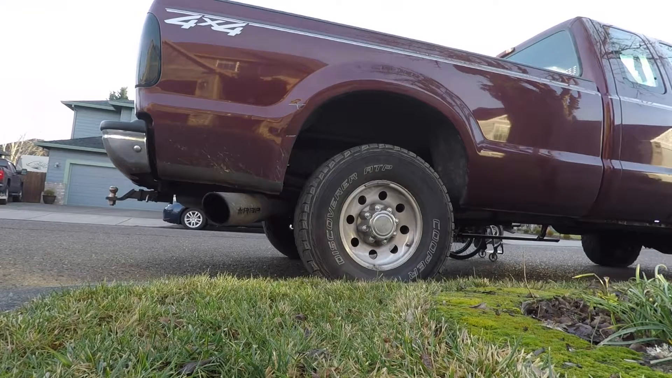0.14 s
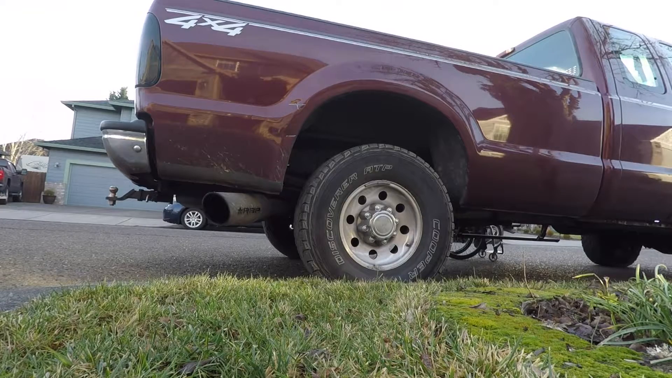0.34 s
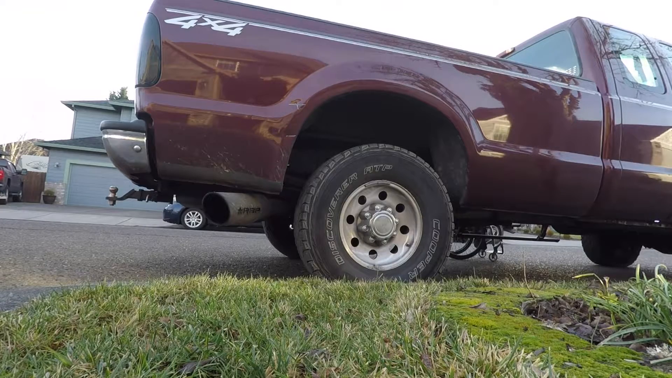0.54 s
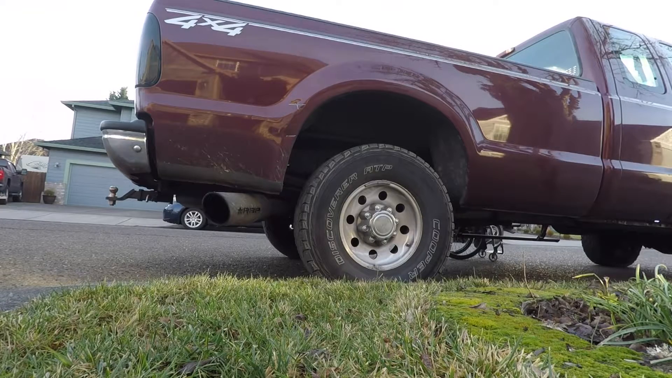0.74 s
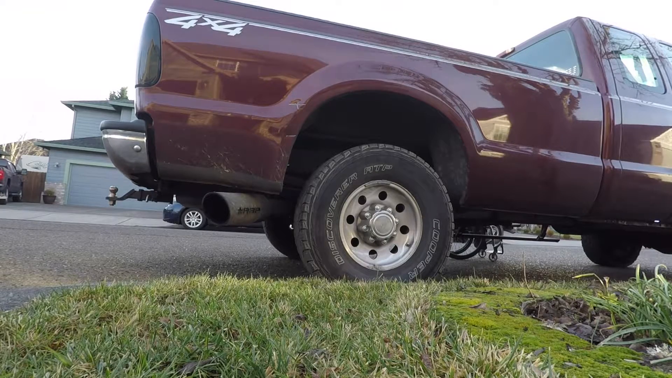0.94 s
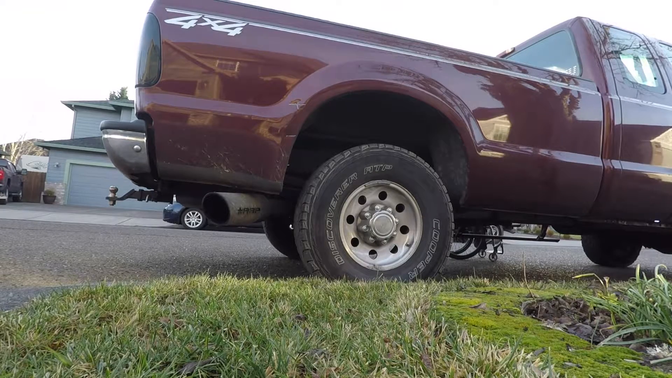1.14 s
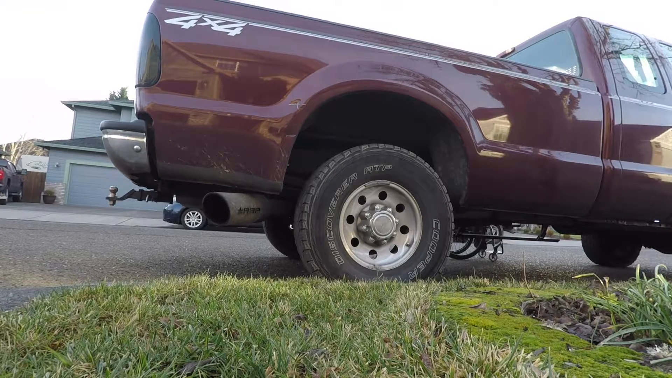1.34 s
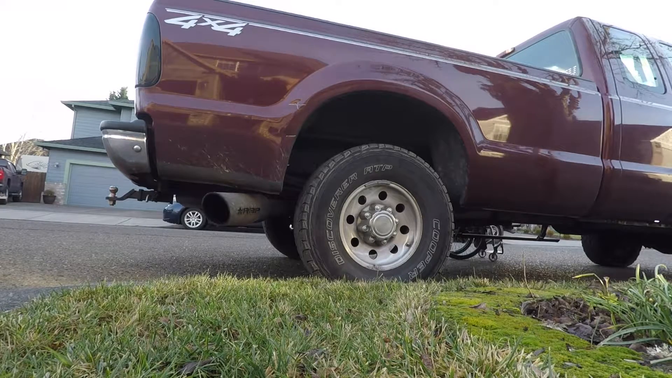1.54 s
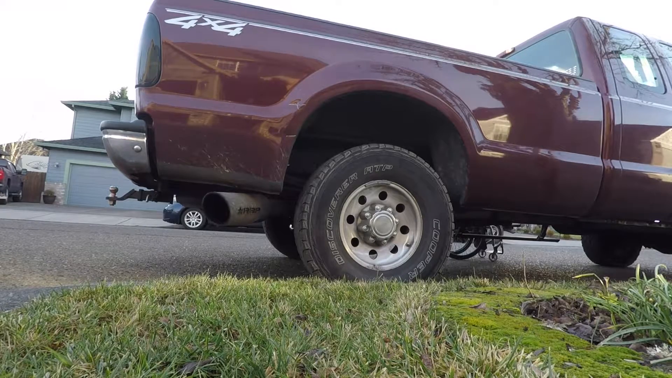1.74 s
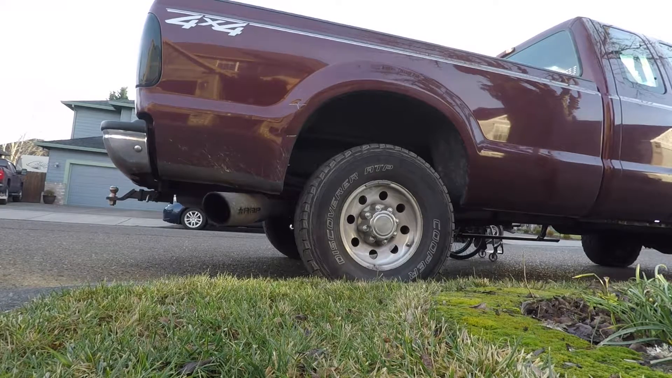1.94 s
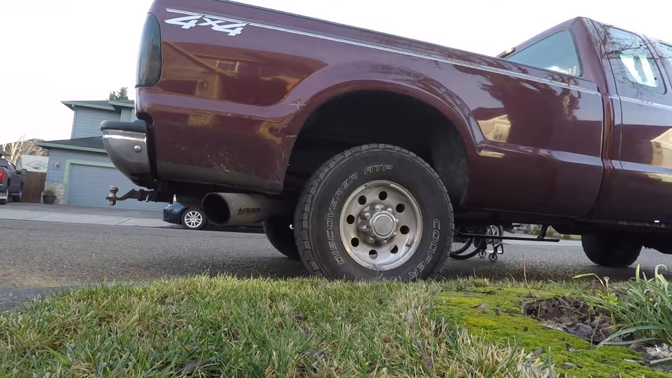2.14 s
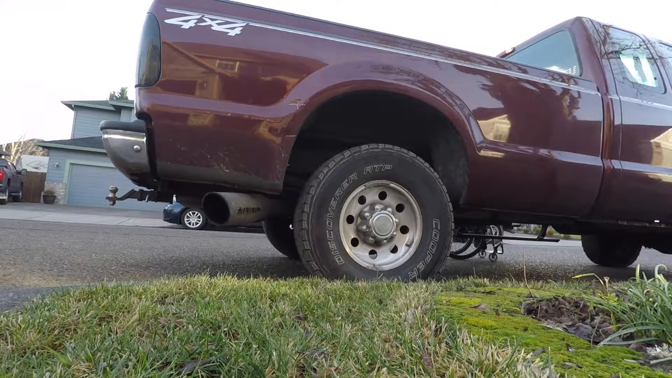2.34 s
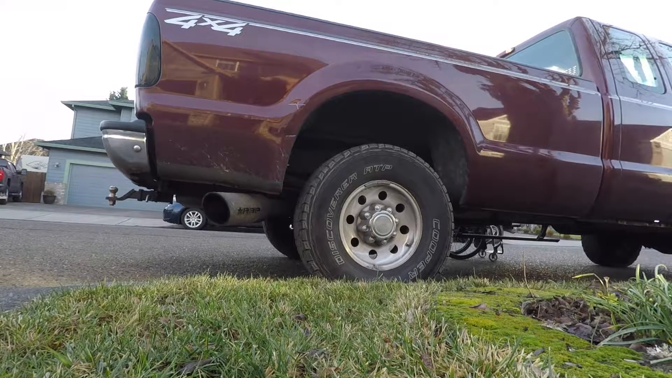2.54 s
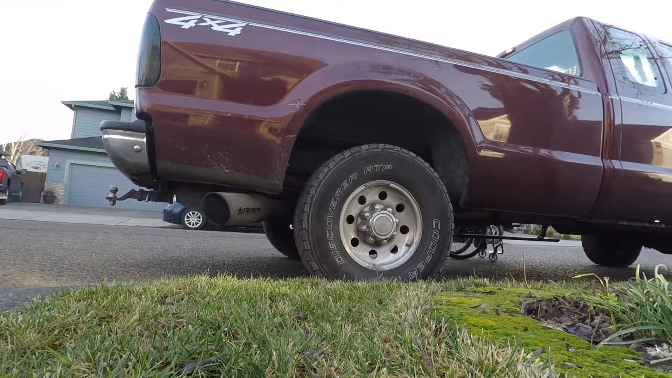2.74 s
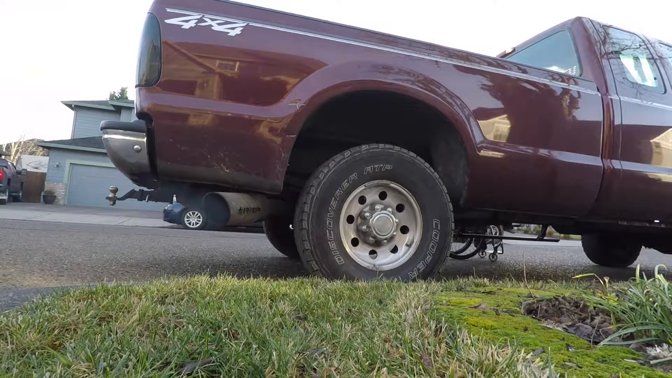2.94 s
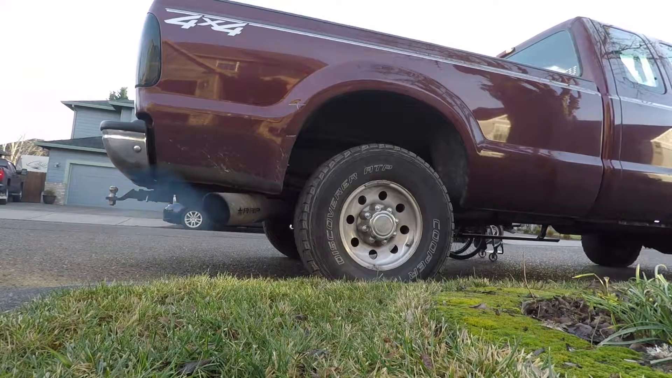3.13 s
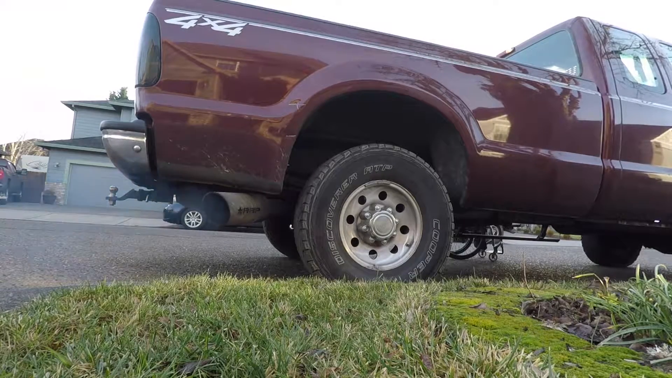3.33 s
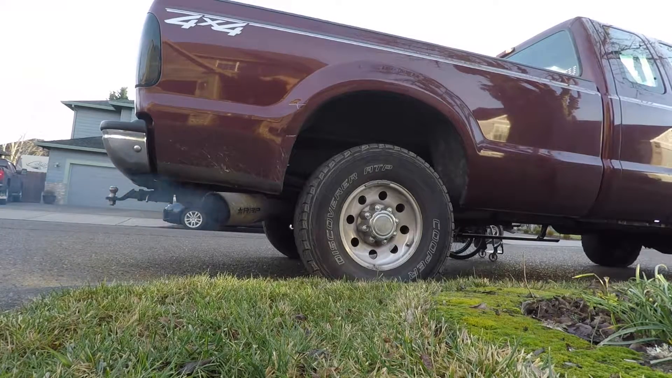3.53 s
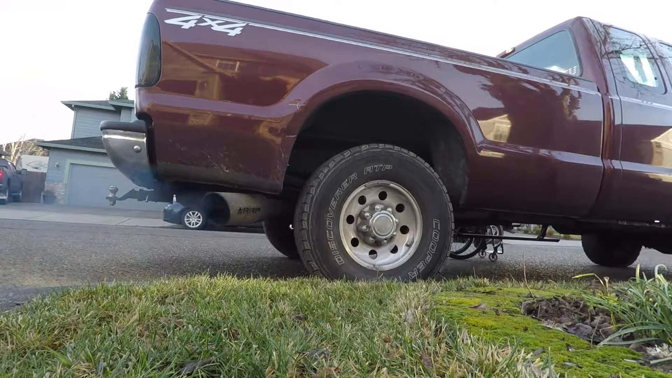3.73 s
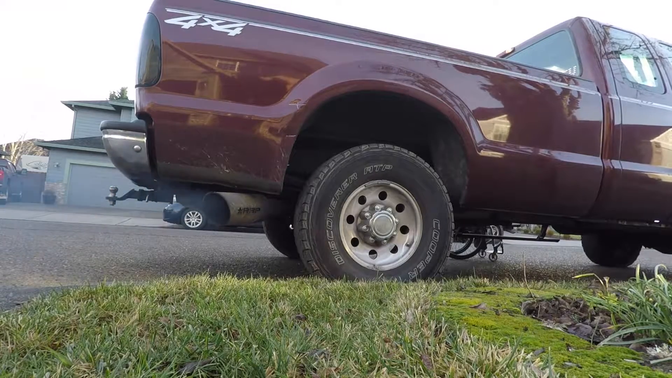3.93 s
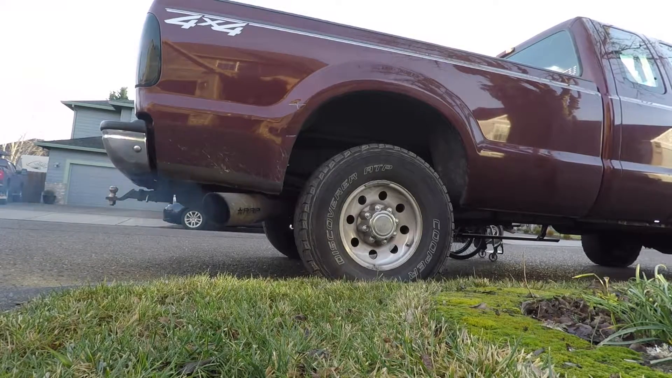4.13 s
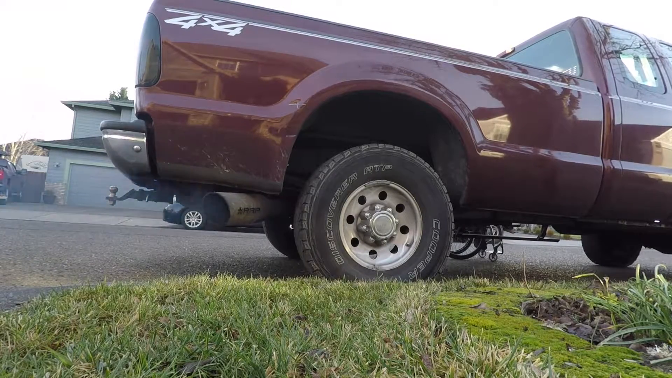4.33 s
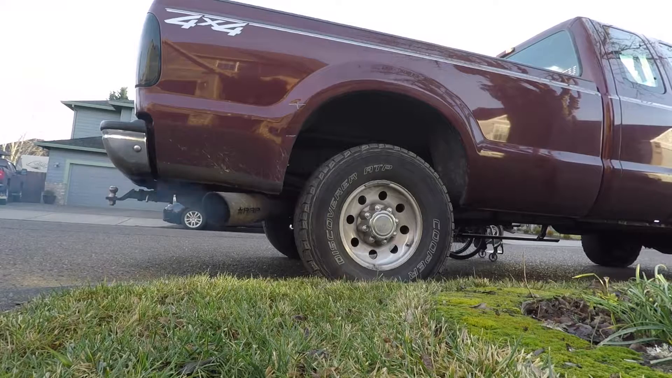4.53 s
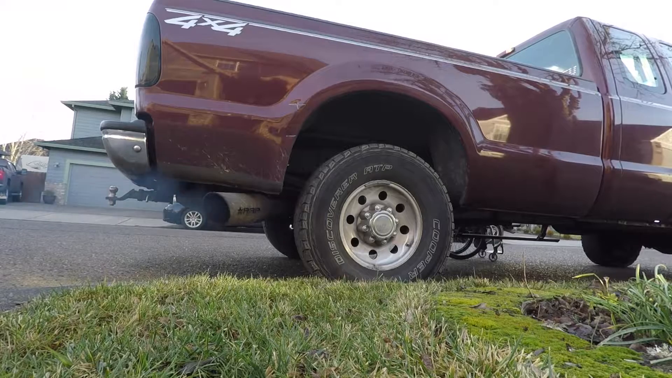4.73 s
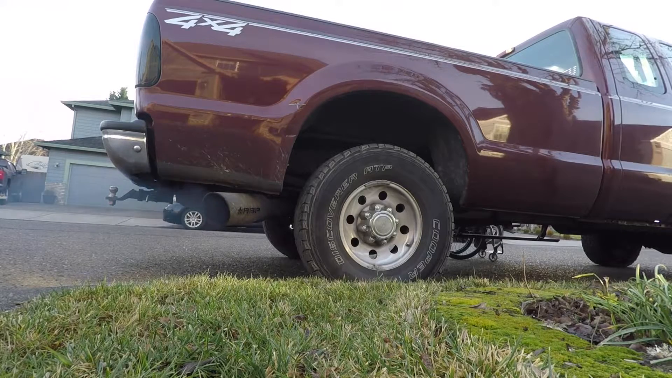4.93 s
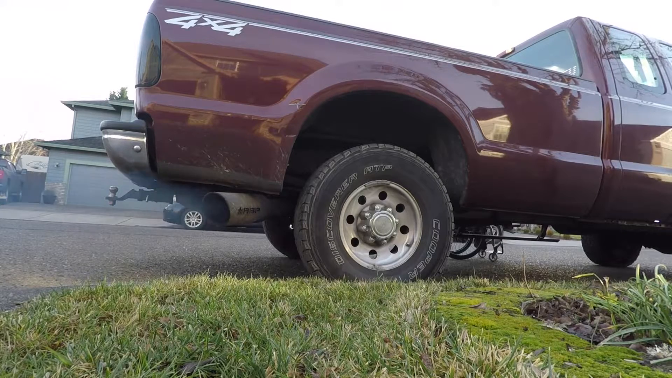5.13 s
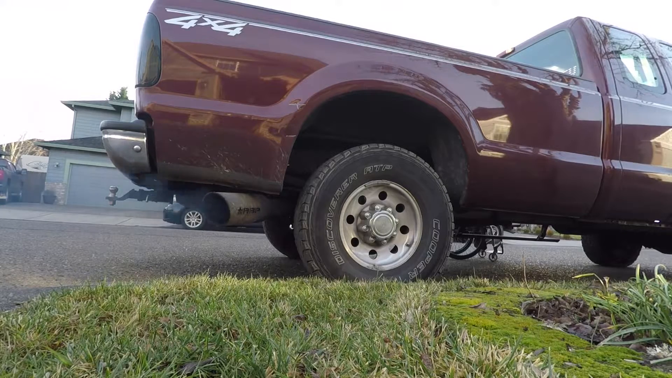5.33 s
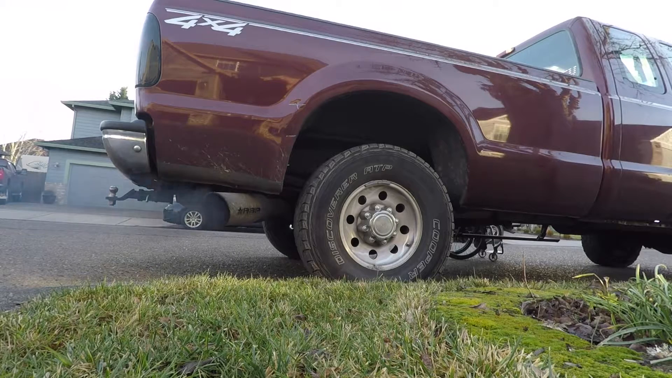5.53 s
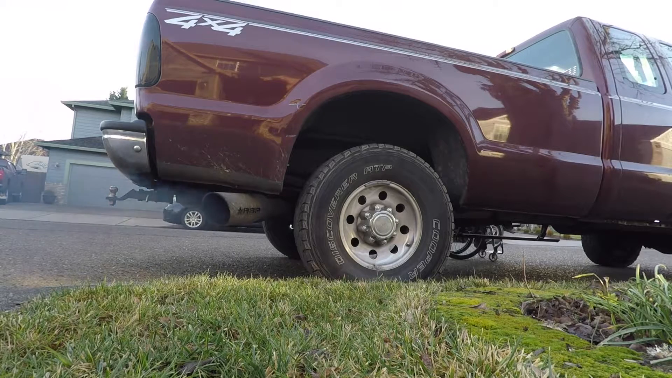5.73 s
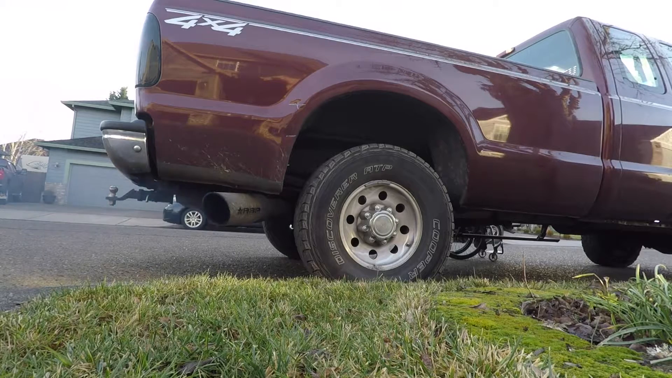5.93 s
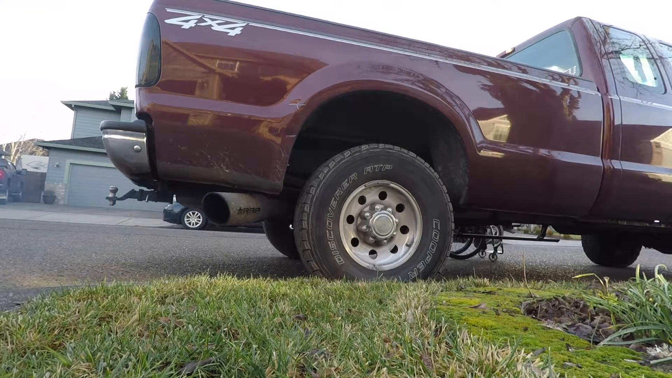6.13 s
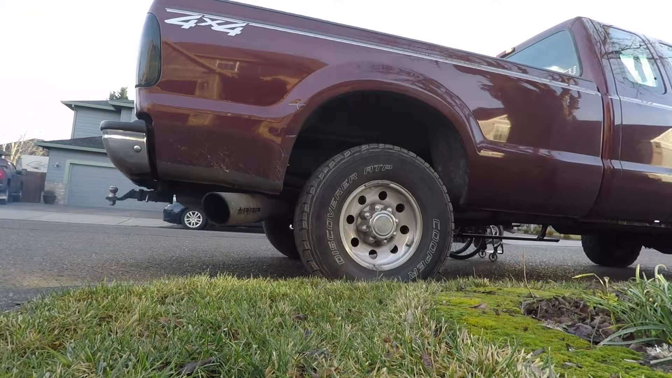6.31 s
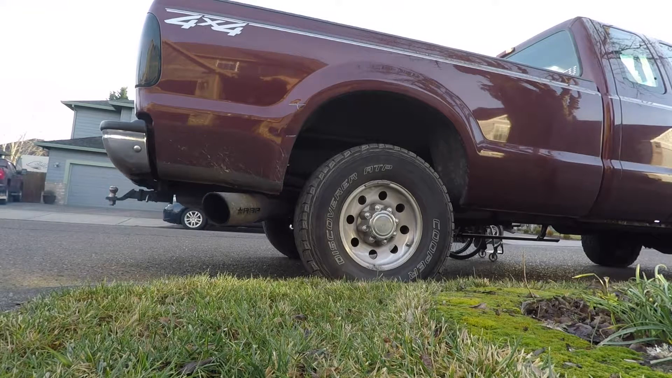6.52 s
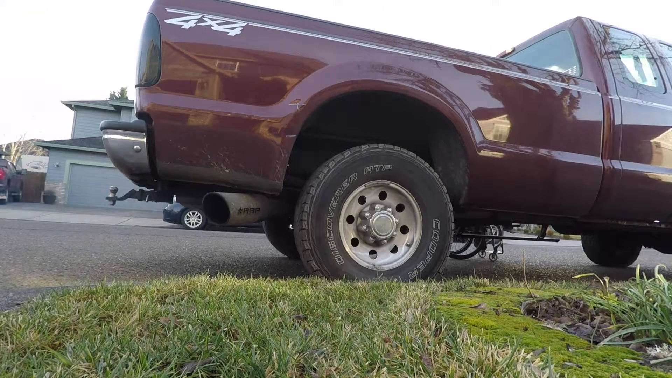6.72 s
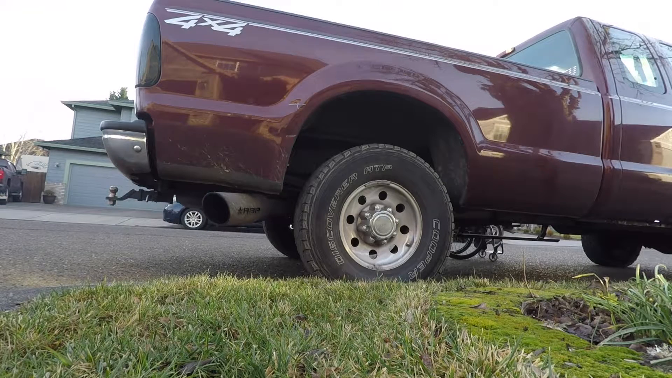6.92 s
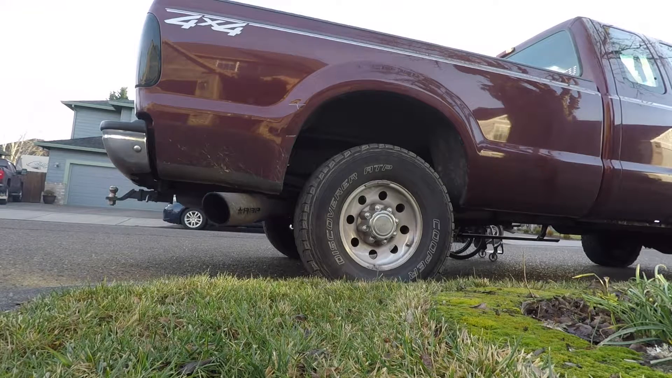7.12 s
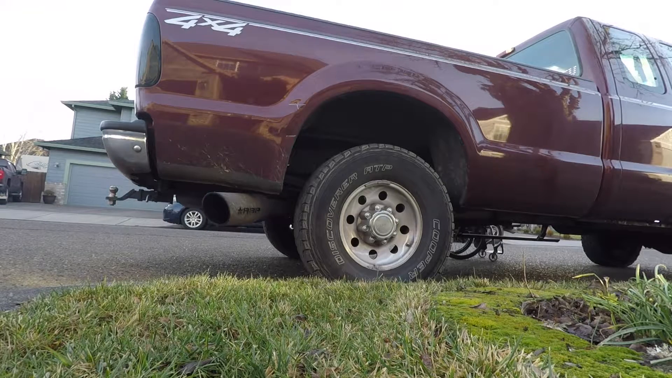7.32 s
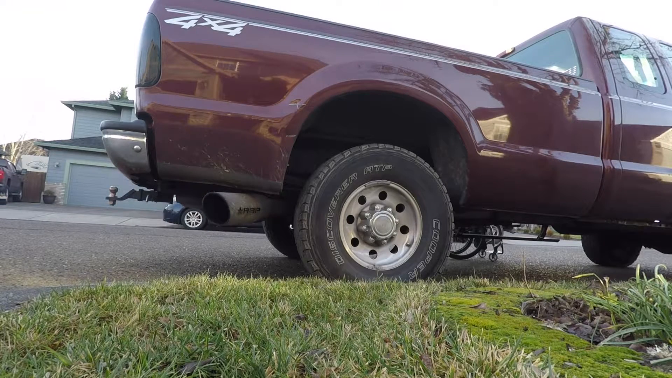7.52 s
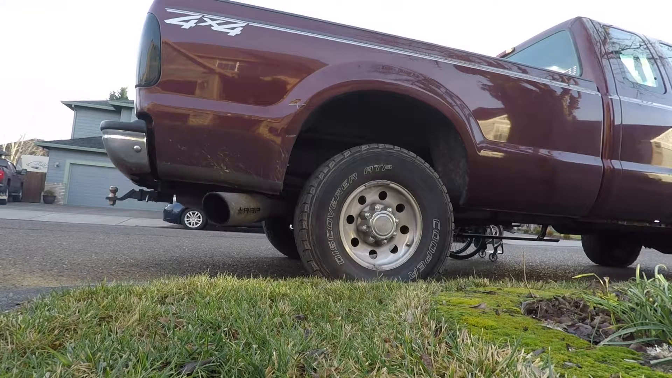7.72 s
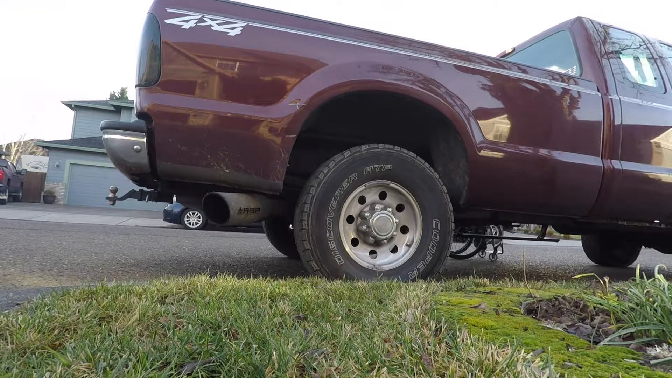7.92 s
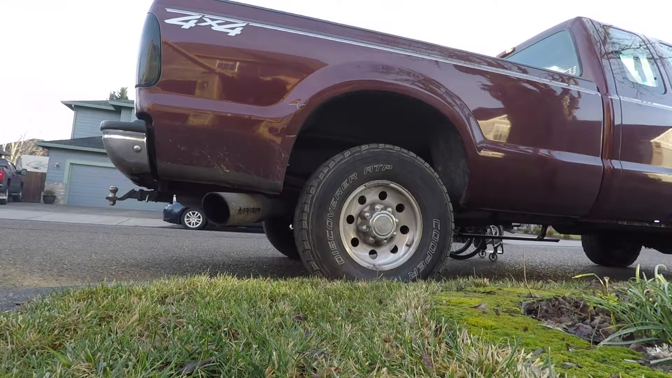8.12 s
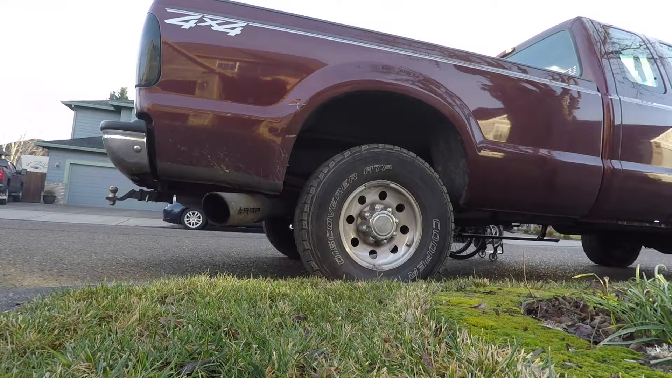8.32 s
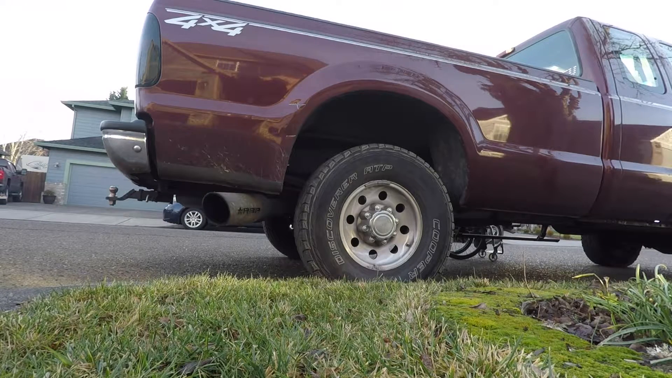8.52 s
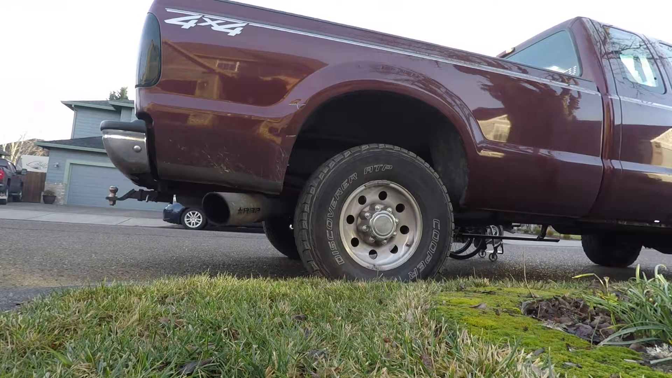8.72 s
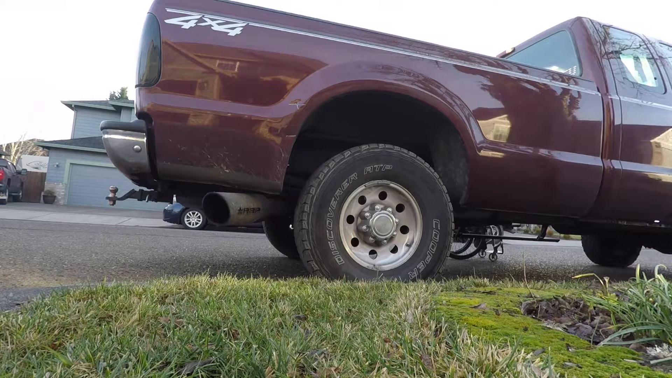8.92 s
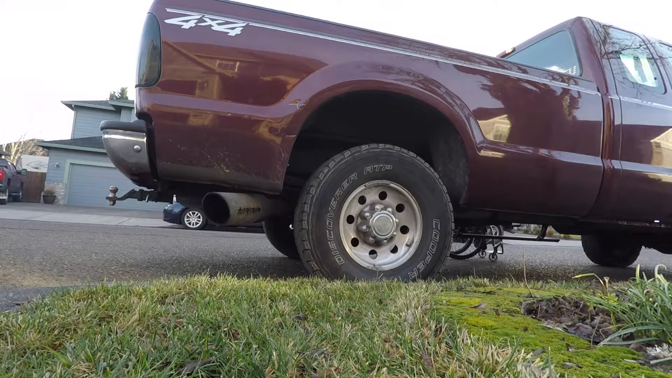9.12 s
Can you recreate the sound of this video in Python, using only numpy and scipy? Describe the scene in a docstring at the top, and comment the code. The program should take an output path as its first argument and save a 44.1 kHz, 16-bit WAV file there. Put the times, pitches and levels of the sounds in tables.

```python
"""A V8 diesel pickup starts from cold, heard from the lawn beside its wide tailpipe.
The engine is a train of strokes timed by the crank: gas slugs ring the pipe, knocks ring the block.
It surges and sags six times, hunts twice more, gently, and settles into a loping, clattering idle
that slowly speeds up. Before it fires, the pump's two sines hum, filtered blows make the starter's
clank, and tooth strikes and noise make its grind. A faint noise band is the distant street."""
import sys
import numpy as np
from scipy import signal
from scipy.io import wavfile
from scipy.ndimage import uniform_filter1d

SR = 44100
rng = np.random.default_rng(int(sys.argv[2]) if len(sys.argv) > 2 else 0)


def unload_audio(sound):
    """Save the sound as a 16-bit wav file, at the path given as the first command line argument."""
    columns = np.transpose(np.atleast_2d(sound))
    # keep every value between -1 and 1, then stretch to whole-number steps
    steps = np.round(np.clip(columns, -1, 1) * 32767)
    wavfile.write(sys.argv[1], SR, steps.astype(np.int16))


N = 408366
TIME = np.arange(N) / SR

# Levels within a spectrum or a set of modes are relative, unless a layer's own level is stated.
# distant street: pitch_hz, level_db
STREET = [(30, -14), (90, -16), (200, 1.5), (600, -3.5), (2000, -14), (6000, -25), (15000, -36)]
STREET_DB = -47
# hum of the fuel pump, before its swell and fade: pitch_hz, level_db
PUMP = [(156.1, -38), (312.2, -58)]

# the solenoid snaps, then the pinion slams into the ring gear: start_s, level_db, decay_s
CLANKS = [(0.064, -19, 0.09), (0.092, -6.5, 0.042), (0.111, 0, 0.039), (.128, -9, 0.021)]
# ring of the bell housing: pitch_hz, width_hz, level_db
BELL = [(297, 61, 3), (424, 68, 5.5), (505, 53, -7), (780, 83, -7), (1240, 110, -22), (2050, 510, -13.5),
        (2540, 190, -15), (3900, 580, -18.5), (5730, 1000, -25.5)]
# the clank is dull at the top: pitch_hz, gain_db
CLANK_TREBLE = [(100, 0), (5000, -0.5), (8000, -0.5), (10500, -8), (13000, -6), (15000, -14)]
# the starter's mesh, which keeps a faint remainder after the last row: time_s, gain (0-1)
STARTER_ON = [(.09, 0), (.13, 1), (1.2, 1), (1.42, 0.88), (1.7, 0.5), (1.74, 0.1)]
# rattle of the starter's gears: pitch_hz, level_db
GEARS = [(600, -22), (1000, 1.5), (1500, 2.5), (2050, 4), (3000, -1), (4600, -3.5), (6400, -7),
         (7400, -15.5), (9000, -16.5), (11400, -33.5), (12800, -18), (14200, -36)]
# growl of the starter's housing: pitch_hz, level_db
HOUSING = [(90, -36), (170, -3), (270, -4.5), (440, -1), (600, -11), (780, -8), (1000, -38), (1800, -38)]
GRIND_ROUGH = .44  # power share of the grinding that is noise rather than tooth strikes
COMPRESSION_PEAK = 0.34  # place in each stroke where the starter strains most
# whine of the starter's own gears, before the mesh gain: time_s, pitch_hz, level_db
WHINE = [(.12, 1400, -57), (.45, 3160, -50), (1.15, 3540, -48), (1.33, 3950, -43), (1.45, 4640, -42),
         (1.7, 5200, -57)]
# partials of the whine: multiple, level_db
WHINE_PARTIALS = [(.5, -7), (1, 0), (1.3, -9)]
# air pumped out of the tailpipe before the engine fires: pitch_hz, level_db
CHUFF = [(12, -16), (24, -3), (34, -1), (55, -3.5), (80, -20), (160, -46)]
# level of that air: time_s, level_db
CHUFF_LEVEL = [(.15, -58), (.6, -34), (1.2, -27.5), (1.5, -21), (1.9, -70)]

# crank speed on the starter: time_s, speed (strokes per second)
CRANK_SPEED = [(0.12, 4.95), (0.42, 5.75), (0.55, 8), (0.75, 8.7), (1.15, 8.58), (1.33, 12.75),
               (1.42, 21.58)]
# crank speed through the hunts into the warming idle: time_s, speed (strokes per second)
IDLE_SPEED = [(4.52, 25.73), (4.66, 44.26), (4.76, 46.1), (4.92, 39.62), (5.06, 38.3), (5.21, 43.47),
              (5.37, 38.01), (5.6, 44.38), (5.8, 42.39), (6, 45.42), (6.35, 45.66), (6.55, 47.2),
              (6.92, 49.74), (7.15, 49.57), (7.4, 51.22), (8.15, 52.2), (8.5, 53.14), (9.26, 54.09)]
# the governor opens the fuel, the engine races, the fuel is cut:
# open_s, cut_s, top_speed (strokes per second), strength_db
SURGES = [(1.48, 1.71, 84, -1.3), (2.07, 2.21, 78, -.3), (2.54, 2.68, 85, .2), (3.05, 3.19, 81, 1),
          (3.56, 3.71, 90, .6), (4.05, 4.19, 86, 2)]
# two milder hunts follow: open_s, cut_s, strength_db
HUNTS = [(4.598, 4.715, -6.5), (5.02, 5.19, -10.5)]
LEAD_S, CUT_S = 0.034, 0.027  # the fuel level rises before the opening and takes a moment to shut off
STALL_SPEED, OPEN_SPEED = 24, 35  # strokes per second near stalling and as the fuel opens
CLIMB_POWER = 1.3  # the climb in speed steepens by this power
PICKUP_S, OVERRUN_S = .05, .015  # the crank picks up before full fuel and runs on past the cut
COAST_S = .12  # time constant of the coast down

# cylinders in firing order: exhaust_db, tailpipe_lag_s, blat_db, knock_db, thud_db
CYLINDERS = [(2, -.0011, 0, 6.5, -12), (1, .0003, 3.5, 3.5, -2.5), (1.5, .0012, -2, -2.5, -15),
             (1.5, .0003, 2, 5, -11.5), (-1, -.0012, 1.5, 6.5, -16.5), (1.5, .0002, 2, 2.5, 3),
             (-1.3, .0013, -2, 4.5, -10.5), (1, .0001, 0.5, 2.5, -7.5)]
# boom under the surges, from dead strokes through first firings and coasting to idle: time_s, level_db
BOOM_LEVEL = [(.15, -53), (.7, -38.5), (1.33, -32), (1.38, -20), (1.45, -17.5), (1.95, -22.5), (2.42, -30),
              (2.88, -22.5), (3.45, -25), (3.98, -25.5), (4.33, -18.5), (4.5, -21.5), (4.7, -16.5),
              (4.87, -14), (4.98, -20), (5.12, -19.5), (5.5, -12), (9.26, -12.5)]
# firings under the surges; the governor holds more fuel as it settles: time_s, blat_db, clatter_db
FIRING_LEVEL = [(1.28, -36, -49), (1.44, -25.5, -37), (2.0, -30, -42.5), (2.45, -34, -46.5),
                (3.95, -33.5, -44.5), (4.5, -27.5, -39.5), (4.97, -25, -37), (5.1, -24.5, -35),
                (5.45, -20, -31.5), (6.3, -20.5, -31.5), (9.26, -19, -30)]
# standing waves of the exhaust system: pitch_hz, width_hz, level_db
PIPE = [(48.8, 16.7, -1), (88.5, 7.3, 3.5), (106.7, 7.5, -6), (119.5, 6.1, -0.5), (153.4, 9, -7.5),
        (188, 8, -9.5), (221.4, 13.3, -7.5)]
# chambers of the muffler, which hold back the tones near their own: pitch_hz, width_hz
MUFFLER = [(122, 58), (172, 55)]
# the pipe under a rush of gas, its standing waves damped: pitch_hz, level_db
RUSH = [(20, -20), (40, -2.5), (55, -3.5), (82, -0.5), (122, 1), (155, -10.5), (188, -3), (215, -7.5),
        (300, -17), (600, -44)]
# the pipe with the flow only churning: pitch_hz, level_db
CHURN = [(20, -13), (45, -1), (62, 0), (85, -6), (120, 1.5), (150, -13), (186, -5), (230, -9.5),
         (300, -21.5), (600, -45)]
# the firing tone rules while the fuel is open and breaks up once it is cut: greatest power share, drop
RUSH_DB, RUSH_DROP_DB = -.15, 4.5
RUSH_FADE_DB_PER_S = 45
# gas leaving the tailpipe at idle: pitch_hz, level_db
BLAT_IDLE = [(90, -29), (150, -19), (176, -20), (218, -9), (262, -10), (300, -3.5), (340, -1), (440, -5.5),
             (540, -7), (660, -4.5), (790, -17), (900, -17.5), (1150, -28), (2000, -42)]
# gas leaving the tailpipe under full fuel: pitch_hz, level_db
BLAT_FULL = [(80, -40), (140, -2.5), (185, 2), (255, -3.5), (340, -1), (450, -2.5), (540, -10), (715, -5),
             (866, -18.5), (1010, -15), (1200, -48), (2000, -49)]
# turbulence behind each slug, which holds little bass: pitch_hz, level_db
EDDIES = [(100, -16), (220, -5), (380, -1), (2000, 0.5)]
GAS_LIKENESS = .7  # power share of the turbulence that recurs with each cylinder
# ring of the muffler when two slugs crowd into one manifold: pitch_hz, width_hz, level_db
THUD = [(219, 32, 1.5), (362, 75, -4)]
# the thud is low and soft, without treble: pitch_hz, gain_db
THUD_BAND = [(120, -20), (190, 0), (420, 0), (700, -18), (1500, -45)]
# level of the thud: time_s, level_db
THUD_LEVEL = [(4.5, -46), (5.5, -38), (6.3, -32), (7, -26), (9.26, -28)]
# hiss of the hard-driven jet: pitch_hz, level_db
RASP = [(700, -19.5), (1200, -7.5), (1700, 3), (2400, -7), (3500, -2.5), (5200, -14), (6300, -12),
        (8200, -21), (10500, -36.5), (13000, -33), (15000, -36)]
# ring of the engine block: pitch_hz, level_db
BLOCK = [(700, -16), (1150, -6.5), (1620, -0.5), (2050, -5), (2650, -14), (3000, -11.5), (4000, -13.5),
         (5300, -24), (6150, -25), (7800, -28), (9200, -39), (11500, -50), (12800, -37), (15000, -53)]
# ringing parts of the engine: pitch_hz, level_db
PARTS = [(1523, 2), (1660, 0.5), (1790, -7), (1954, -3), (2980, -5), (3340, -6.5), (3710, -6.5), (4020, -9)]
# a cold cylinder lights late and knocks hard: start_s, level_db
HARD_KNOCKS = [(5.221, -23.5), (5.424, -25), (5.612, -25), (5.982, -25), (7.080, -23), (7.477, -26),
               (7.771, -28), (7.868, -24.5), (9.077, -28)]
# an overfuelled slug bangs out of the tailpipe: start_s, level_db
BANGS = [(1.502, -5.5), (2.057, -18), (2.105, -13), (2.528, -14), (2.575, -11), (3.122, -9), (3.641, -9),
         (4.041, -18), (4.195, -6)]
# hard-driven firings crack sharply during the surges: start_s, level_db
CRACKS = [(2.093, -30), (2.527, -34.5), (2.575, -31), (2.665, -25), (3.045, -34), (3.075, -27),
          (3.197, -22.5), (3.581, -29), (3.697, -33), (3.989, -40), (4.038, -41), (4.137, -30),
          (4.176, -25), (4.199, -24.5)]
# colour of the cracks: pitch_hz, level_db
CRACK = [(900, -15), (1700, 5), (2400, -7), (3550, 5.5), (4200, 1), (5200, -9), (6300, -7.5), (8200, -16.5),
         (10500, -31), (13000, -29), (15000, -30)]
EDGE_HZ = 15150  # upper band limit


def amp(db):
    """Decibels express an amplitude ratio as 20 times its common logarithm."""
    return 10 ** (np.asarray(db) / 20)


def noise():
    """White noise carries equal power at every frequency."""
    return rng.standard_normal(N)


def along(rows):
    """A two-column path is followed in time by linear interpolation."""
    return np.interp(TIME, *np.transpose(rows))


def evened(x):
    """Division by the root mean square gives unit power."""
    return x / np.sqrt(np.mean(x ** 2) + 1e-20)


def steadied(x, span):
    """Division by the running rms gives roughly unit power over every stretch of span seconds."""
    size = max(int(span * SR), 8)
    power = uniform_filter1d(uniform_filter1d(x ** 2, size), size)
    return x / np.sqrt(abs(power) + 1e-4 * np.mean(x ** 2))


def colour(x, points):
    """Minimum phase: the Hilbert transform of the log gain makes a (Hz, dB) response causal."""
    hz, db = np.transpose(points)
    grid = np.fft.rfftfreq(16384, 1 / SR)
    log_gain = np.log(amp(np.interp(np.log(grid + 1), np.log(hz), db)))
    log_gain -= np.maximum(np.log(grid / hz[-1] + 1e-9), 0) * 3  # cubic fall above the last point
    both_sides = np.r_[log_gain, log_gain[-2:0:-1]]
    ring = np.fft.ifft(np.exp(np.conj(signal.hilbert(both_sides)))).real
    return signal.oaconvolve(x, ring[:len(ring) // 2])[:N]


def resonances(modes):
    """Resonance: the powers of (Hz, width, dB) modes add into one (Hz, dB) response."""
    grid = np.geomspace(12, 15000, 1200)
    power = sum(amp(db) ** 2 / (1 + ((grid ** 2 - hz ** 2) / (grid * width)) ** 2)
                for hz, width, db in modes)
    return np.c_[grid, 10 * np.log10(power)]


def clicks(times, sizes):
    """An impulse at each time excites whatever filter follows."""
    return np.bincount(np.clip(times * SR, 0, N).astype(int), sizes, N + 1)[:N]


def fade(x, time):
    """First-order relaxation smears each impulse into an exponential decay of unit area."""
    keep = np.exp(-1 / (time * SR))
    return signal.lfilter([1 - keep], [1, -keep], x + 1e-30)


def puffs(train, grain, rise, decay, echo_db, echo_time):
    """Scattering: each impulse starts a noisy burst; underbody and house fronts add a tail."""
    power = fade(fade(fade(train ** 2, rise / 2), rise / 2), decay / 2)
    power = power + amp(echo_db) ** 2 * fade(power, echo_time)
    return np.sqrt(abs(power)) * grain


def blend(a, b, share):
    """Powers of unrelated sounds add: an equal-power mix holding the given share of b."""
    share = np.clip(share, 0, 1)
    return np.sqrt(1 - share) * a + np.sqrt(share) * b


def panels(x, wet_db, t60):
    """Reverberant decay: the many faint rings of frame and sheet metal."""
    t = np.arange(SR // 2) / SR
    sparse = rng.random(len(t)) < 2500 / SR  # about 2500 reflections per second
    taps = rng.standard_normal(len(t)) * sparse * (t > .002) * amp(-60 * t / t60)
    return x + amp(wet_db) * signal.oaconvolve(x, taps / np.linalg.norm(taps))[:N]


def bursts(events, response, rise, decay):
    """Impulsive excitation: noisy blows of one colour, each scaled by its row's level."""
    s, db = np.transpose(events)
    power = fade(fade(clicks(s, amp(db) ** 2), rise), decay / 2) * SR * decay / 2
    return np.sqrt(abs(power)) * steadied(colour(noise(), response), span=0.0087)


def distant_street():
    """Many unresolved distant sources add up to steady coloured noise."""
    return amp(STREET_DB) * evened(colour(noise(), STREET))


def pump():
    """Periodic vibration: the electric fuel pump hums in two sines, swelling and then sinking."""
    hum = sum(amp(db) * np.sqrt(2) * np.sin(2 * np.pi * hz * TIME) for hz, db in PUMP)
    return hum * np.interp(TIME, [.05, .15, .4, 1.4], [.75, 1.2, 0.93, 0.45])


def engage(db=-13.5):
    """Impact: steel slams on steel and rings the resonances of the bell housing."""
    power = sum(amp(size) ** 2 * (TIME > s) * np.exp(-2 * abs(TIME - s) / decay)
                for s, size, decay in CLANKS)
    shudder = noise()
    housing = resonances(BELL)
    scale = np.std(colour(shudder, housing))
    return amp(db) * colour(colour(np.sqrt(power) * shudder, housing), CLANK_TREBLE) / scale


def starter(turns, teeth=50, free_speed=13, sag=.13, scatter_db=3.0, housing_rough=0.65):
    """Gear meshing: tooth strikes, slowed at each compression, excite housing growl and gear rattle."""
    speed = np.minimum(np.gradient(turns) * SR, free_speed)  # the clutch slips once the engine runs ahead
    slowing = 1 - sag * np.sin(2 * np.pi * (turns - COMPRESSION_PEAK))
    mesh = np.cumsum(teeth * speed * slowing) / SR
    times = TIME[1:][np.diff(np.floor(mesh)) > 0]
    strikes = clicks(times, amp(scatter_db * rng.standard_normal(len(times))))
    ringing = panels(steadied(strikes, span=0.033), wet_db=-1.0, t60=0.055)
    grind = blend(ringing, noise(), GRIND_ROUGH)
    growl = blend(grind, noise(), housing_rough)
    return steadied(colour(growl, HOUSING), span=0.046), steadied(colour(grind, GEARS), span=0.05)


def cranking(turns, growl_db=-30, growl_swing_db=5, rattle_db=-33, rattle_swing_db=2.5,
             bite=1.9, uneven_db=0.4):
    """Varying load: the starter strains once per compression until the firings take its load."""
    growl, rattle = starter(turns)
    depth = np.interp(TIME, [.2, .4, 1.25, 1.42], [0.04, 0.71, 0.85, 0.1])
    strain = np.cos(2 * np.pi * (turns - COMPRESSION_PEAK)) * depth
    luck = rng.standard_normal(int(turns[-1]) + 1)
    stiffness_db = uneven_db * np.interp(turns - COMPRESSION_PEAK, np.arange(len(luck)), luck)
    growling = amp(growl_db + growl_swing_db * strain + stiffness_db) * growl
    rattling = amp(rattle_db + rattle_swing_db * np.tanh(bite * strain)) * rattle
    return along(STARTER_ON) * (growling + rattling)


def whine(turns, width_hz=210, sag=0.1, flutter_db=3):
    """Tooth-meshing tones follow shaft speed: a broken voice dips at each compression, then climbs."""
    s, pitch_hz, level_db = np.transpose(WHINE)
    dip = -sag * np.sin(2 * np.pi * (turns - COMPRESSION_PEAK)) * np.interp(TIME, [1.15, 1.3], [1, 0])
    angle = 2 * np.pi * np.cumsum(np.interp(TIME, s, pitch_hz) * (1 + dip)) / SR
    blur_s = 1 / (np.pi * width_hz)
    out = 0
    for multiple, db in WHINE_PARTIALS:
        blur = fade(fade(noise(), blur_s), blur_s)  # slow noise spreads the tone into a band
        flutter = amp(flutter_db * evened(fade(fade(noise(), .006), .006)))
        out = out + amp(db) * evened(np.cos(multiple * angle) * blur * flutter)
    return out * amp(np.interp(TIME, s, level_db)) * along(STARTER_ON)


def chuff():
    """Flow noise: the pistons pump cold air through the pipe in a dull flutter."""
    air = steadied(colour(noise(), CHUFF), span=.15)
    return air * amp(along(CHUFF_LEVEL)) * (TIME > CRANK_SPEED[0][0])


def rev(start, cut, top):
    """Torque and drag: a steepening climb, then cold oil slows the flywheel almost to a stall."""
    crest = cut + OVERRUN_S
    share, age = np.linspace(0, 1, 5), np.array([.05, .1, .2])
    climb = zip(start + share * (crest - start), OPEN_SPEED + (top - OPEN_SPEED) * share ** CLIMB_POWER)
    coast = zip(crest + age, STALL_SPEED + (top - STALL_SPEED) * np.exp(-age / COAST_S))
    return [(start - PICKUP_S, STALL_SPEED), *climb, *coast]


def crank():
    """Speed integrates to strokes turned; each whole stroke gives a time and a row of cylinder values."""
    swings = [point for start, cut, top, _ in SURGES for point in rev(start, cut, top)]
    speed = np.interp(TIME, *np.transpose(CRANK_SPEED + swings + IDLE_SPEED), left=0)
    turns = np.cumsum(speed) / SR
    stroke = np.arange(1, int(turns[-1]) + 1)
    return turns, np.interp(stroke, turns, TIME), np.array(CYLINDERS)[stroke % len(CYLINDERS)].T


def surging(base_db, peak_db, rise, climb_db, drop_db, fade_db_per_s, follow):
    """Fuel sets the level in dB: it rises, climbs with speed, drops at the cut and fades to the base."""
    t, power = TIME[::SR // 1000], 0  # about one step per millisecond
    for start, cut, *_, strength_db in SURGES + HUNTS:
        attack = np.clip((t - start + LEAD_S) / rise, 0, 1)
        sag_db = np.interp(t, [start, cut, cut + CUT_S], [climb_db, 0, drop_db])
        sag_db = sag_db + fade_db_per_s * np.maximum(t - cut, 0)
        depth = amp(min(strength_db, 0))  # a mild surge is cut less deeply
        power = power + (attack * amp(peak_db + follow * strength_db - depth * sag_db)) ** 2
    return 10 * np.log10(amp(base_db) ** 2 + np.interp(TIME, t, power))


def signature(times, likeness):
    """Partly recurring noise: each cylinder has its own path through the manifold and the block."""
    stroke = np.maximum(np.searchsorted(times, TIME) - 1, 0)
    age = np.clip((TIME - times[stroke]) * SR, 0, 4095).astype(int)  # samples since the stroke
    own = rng.standard_normal((len(CYLINDERS), 4096))
    return blend(noise(), own[stroke % len(CYLINDERS), age], likeness)


def muffled(x):
    """All-pass dispersion: chambers delay their own bands, so a sharp slug becomes a rolling wave."""
    for hz, width_hz in MUFFLER:
        keep = np.exp(-np.pi * width_hz / SR)
        poles = [1, -2 * keep * np.cos(2 * np.pi * hz / SR), keep ** 2]
        x = signal.lfilter(poles[::-1], poles, x)
    return x


def firing_tone(turns, count=4, tilt_db=-2, delay=0.00804, jitter=.022, uneven_db=1.4):
    """Harmonics of the firing rate glide with the crank; cold strokes vary in time and strength."""
    speed = np.gradient(turns) * SR
    turned = np.interp(TIME - delay, TIME, turns)
    luck = rng.standard_normal((int(turns[-1]) + 1, count + 1)).T
    slip, *sizes = [np.interp(turned, np.arange(len(row)), row) for row in luck]
    tone = 0
    for k, size in enumerate(sizes, 1):
        level_db = np.interp(k * speed, *np.transpose(RUSH)) + tilt_db * k + uneven_db * size
        tone = tone + amp(level_db) * np.cos(2 * np.pi * k * (turned + jitter * slip))
    return tone


def boom(turns, times, db, coasting, rush, scatter_db=1.95, coast_rough=0.42, rumble_db=-25):
    """Pipe resonance: slugs ring it, a rush of gas sweeps freely, and without fuel the flow churns."""
    train = steadied(clicks(times, amp(db + scatter_db * rng.standard_normal(len(times)))), span=0.17)
    body = [(15, -9.0), (40, 1), (240, 0.5), (300, -13.5), (600, -34.5)]
    ringing = steadied(muffled(colour(colour(train, resonances(PIPE)), body)), span=0.047)
    churn = evened(colour(noise(), CHURN))
    rumble = evened(colour(noise(), [(8, -13), (20, -1), (35, -3.5), (70, -23)]))
    pulsing = blend(ringing, churn, coast_rough * coasting)
    flow = blend(pulsing, steadied(firing_tone(turns), span=0.042), rush)
    return steadied(flow, span=0.053) + amp(rumble_db) * rumble


def blat(times, db, load, scatter_db=1.1, rough=0.55, delay=0.005016, bounce=0.00414, bounce_db=-5):
    """Steep wave fronts are rich in overtones: they and the turbulence behind bark from the tailpipe."""
    sizes = amp(db + scatter_db * rng.standard_normal(len(times)))
    train = clicks(times + delay, sizes)
    fronts = train + amp(bounce_db) * clicks(times + delay + bounce, sizes)  # thrown back by the truck bed
    grain = colour(signature(times, GAS_LIKENESS), EDDIES)
    eddies = puffs(train, grain, rise=0.00091, decay=0.02, echo_db=-1.5, echo_time=0.03)
    gas = blend(evened(fronts), evened(eddies), rough)
    idle = steadied(colour(gas, BLAT_IDLE), span=0.15)
    return blend(idle, steadied(colour(gas, BLAT_FULL), span=0.063), load)


def thud(times, db, scatter_db=2.2, delay=.004):
    """Uneven pulses: crowded slugs make the idle lope, twice in each round of the cylinders."""
    train = clicks(times + delay, amp(db + scatter_db * rng.standard_normal(len(times))))
    body = steadied(colour(colour(train, resonances(THUD)), THUD_BAND), span=0.35)
    return body * amp(along(THUD_LEVEL)) * (TIME > THUD_LEVEL[0][0])


def rasp(times, scatter_db=1.6):
    """Jet noise: under full fuel every slug tears at the rim of the pipe."""
    train = clicks(times + 0.0033, amp(scatter_db * rng.standard_normal(len(times))))
    jet = puffs(train, noise(), rise=0.0026, decay=0.0088, echo_db=-9, echo_time=0.013)
    return steadied(colour(jet, RASP), span=0.089)


def clatter(times, db, scatter_db=1.2, tick_db=-3):
    """Structure-borne sound: diesel knock rings the block; injectors and valves tick between knocks."""
    luck = rng.standard_normal((len(times), 4)).T
    knocks = clicks(times + 0.0058 + 0.001 * luck[0], amp(db + scatter_db * luck[1]))
    ticks = clicks(times + 0.011 + 0.0017 * luck[2], amp(db + tick_db + scatter_db * luck[3]))
    grain = signature(times, likeness=.35)
    blows = puffs(knocks + ticks, grain, rise=0.0036, decay=0.0063, echo_db=-1, echo_time=0.034)
    return steadied(panels(colour(blows, BLOCK), wet_db=-11.0, t60=0.054), span=0.18)


def pings(times, db, ring=0.0066):
    """Damped modes: each knock rings a few stiff parts of the engine, differently at every blow."""
    t = np.arange(SR // 12) / SR
    envelope = np.exp(-t / ring) * (1 - np.exp(-t / 0.0011))
    out = np.zeros(N)
    for hz, size_db in PARTS:
        blows = clicks(times + .007, amp(db + size_db) * rng.standard_normal(len(times)))
        out += signal.oaconvolve(blows, np.sin(2 * np.pi * hz * t) * envelope)[:N]
    return steadied(out, span=0.27)


def misfires():
    """Irregular combustion: hard knocks in the block, bangs and cracks in the pipe."""
    knocks = bursts(HARD_KNOCKS, BLOCK, rise=.001, decay=0.0069)
    bangs = bursts(BANGS, BLAT_FULL, rise=0.00066, decay=0.0093)
    return knocks + bangs + bursts(CRACKS, CRACK, rise=0.0016, decay=0.012)


def engine(turns, times, cylinders, stumble_db=2.0, ping_share=.21):
    """Superposition: boom, blat and clatter follow the surges of fuel, each in its own measure."""
    slug_db, lag, bark_db, knock_db, thud_db = cylinders
    s, blat_base, metal_base = np.transpose(FIRING_LEVEL)
    boom_db = surging(along(BOOM_LEVEL), peak_db=-12.0, rise=0.059, climb_db=0,
                      drop_db=2.5, fade_db_per_s=59, follow=0.12)
    blat_db = surging(np.interp(TIME, s, blat_base), peak_db=-13.5, rise=0.073, climb_db=4.5,
                      drop_db=6.0, fade_db_per_s=104, follow=0.76)
    metal_db = surging(np.interp(TIME, s, metal_base), peak_db=-27, rise=0.057, climb_db=3.5,
                       drop_db=7, fade_db_per_s=94, follow=0.55)
    gas_db = surging(-60, peak_db=3, rise=.02, climb_db=0, drop_db=RUSH_DROP_DB,
                     fade_db_per_s=RUSH_FADE_DB_PER_S, follow=2)
    rush = amp(np.minimum(gas_db, RUSH_DB)) ** 2
    load = 1 / (1 + np.exp(-(blat_db + 17.0) / 1.0))  # the hardest firings are the brightest
    coasting = 1 / (0.5 + np.exp((boom_db + 17.5) / 1.3))  # weak strokes carry no fuel
    luck = np.interp(TIME, times, rng.standard_normal(len(times)))
    stumble = amp(stumble_db * np.minimum(coasting, 1) * luck)
    low = amp(boom_db) * boom(turns, times + lag, slug_db, coasting, rush)
    middle = amp(blat_db) * blat(times + lag, bark_db, load) + thud(times + lag, thud_db)
    metal = blend(clatter(times, knock_db), rasp(times + lag), load)
    metal = blend(metal, pings(times, knock_db), ping_share)
    turning = np.interp(TIME, [.09, .13], [0, 1])
    fired = np.interp(TIME, [1.25, 1.32], [0, 1])
    return stumble * (turning * low + fired * (middle + amp(metal_db) * metal))


def scene():
    """Superposition of pressures: pump, starter and engine over a quiet street."""
    turns, times, cylinders = crank()
    background = distant_street() + pump()
    starting = engage() + cranking(turns) + whine(turns) + chuff()
    return (background + starting + engine(turns, times, cylinders) + misfires())[None]


def record(dry):
    """Saturation rounds off the loudest peaks; a linear-phase low-pass then limits the band."""
    held = dry / (1 + (dry / .97) ** 8) ** (1 / 8)
    low_pass = signal.firwin(511, EDGE_HZ, window=("kaiser", 9), fs=SR)
    return signal.oaconvolve(held, low_pass[None], "same")


dry = scene()
out = record(dry)
unload_audio(out)
```